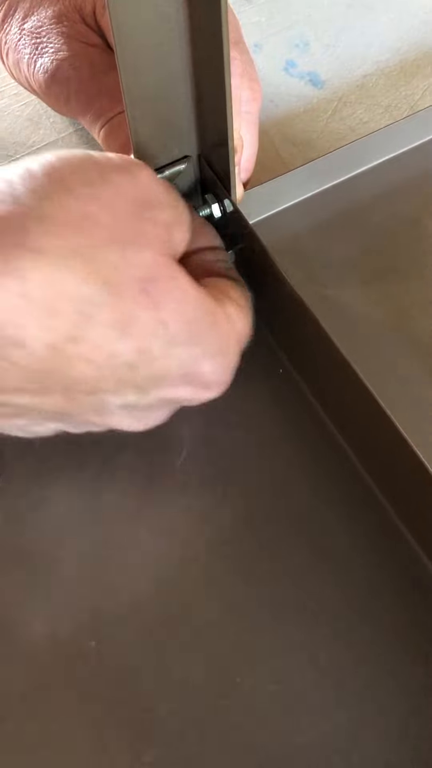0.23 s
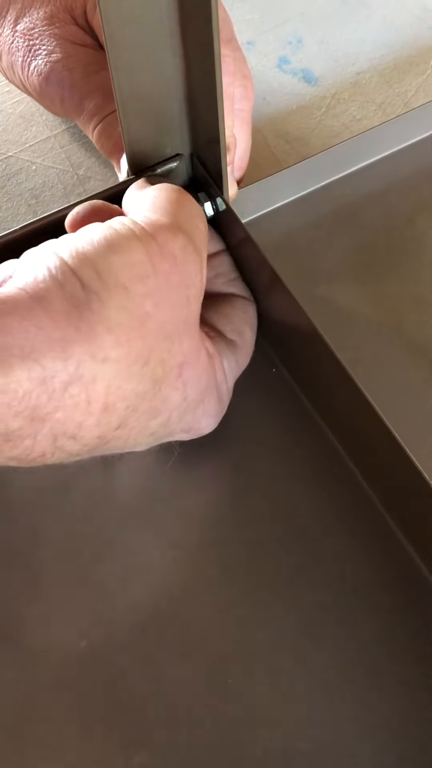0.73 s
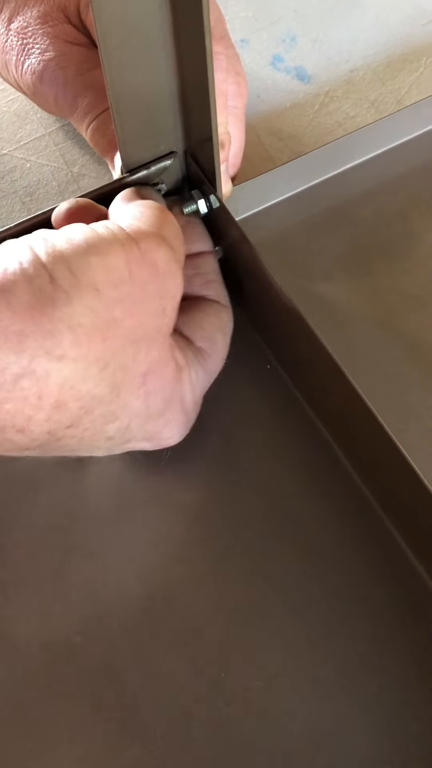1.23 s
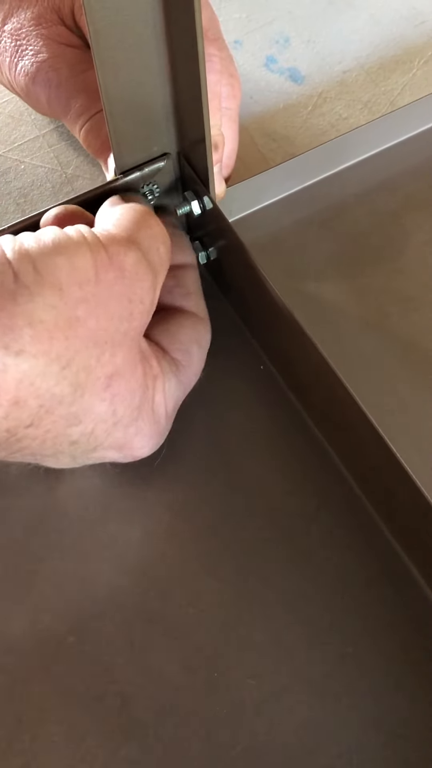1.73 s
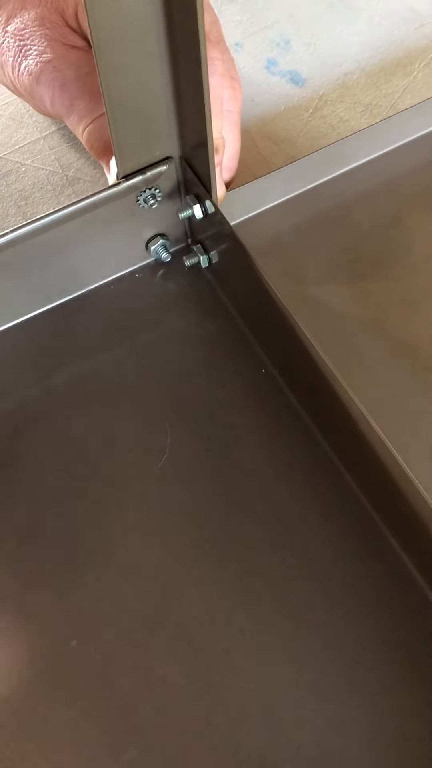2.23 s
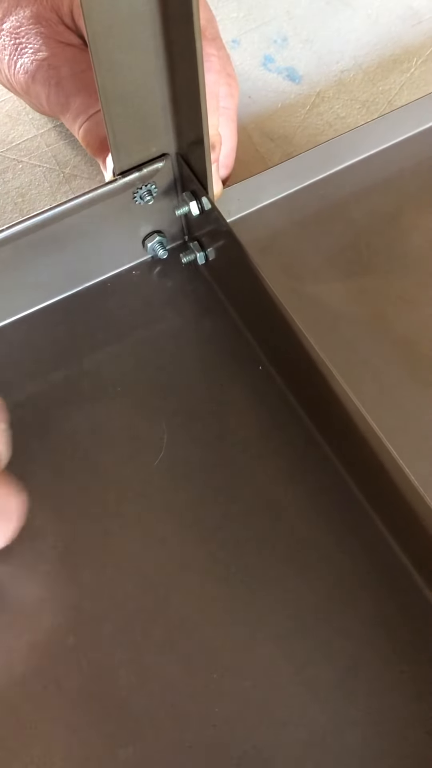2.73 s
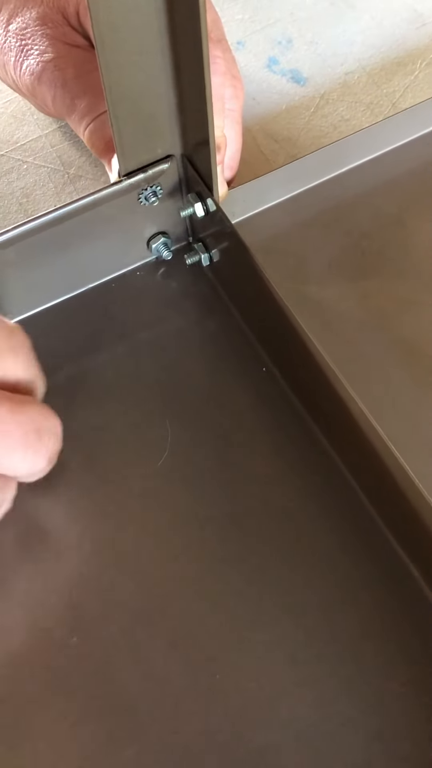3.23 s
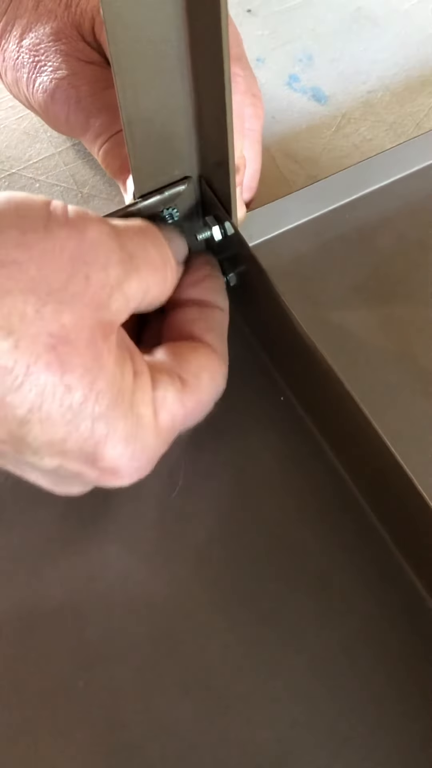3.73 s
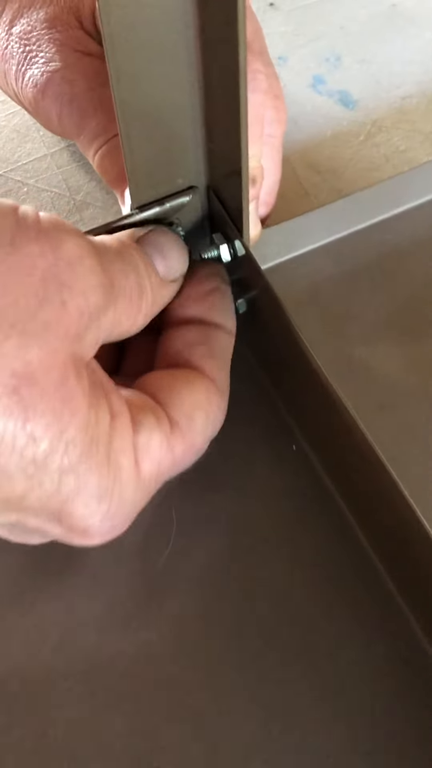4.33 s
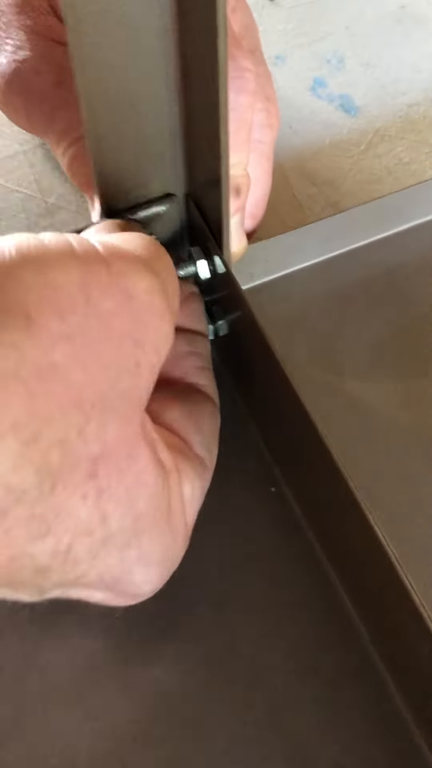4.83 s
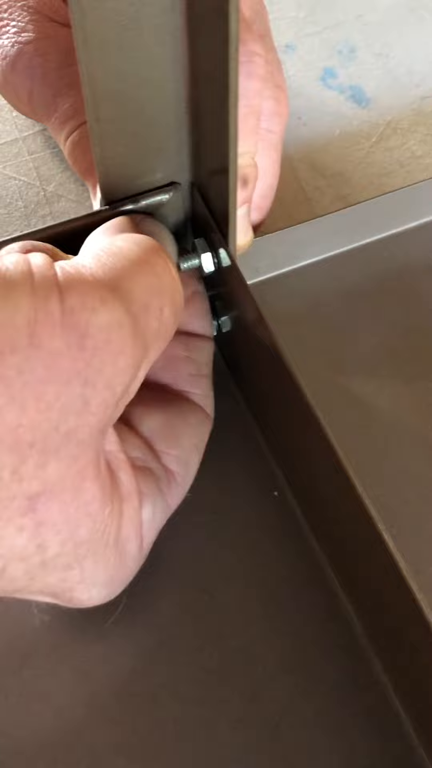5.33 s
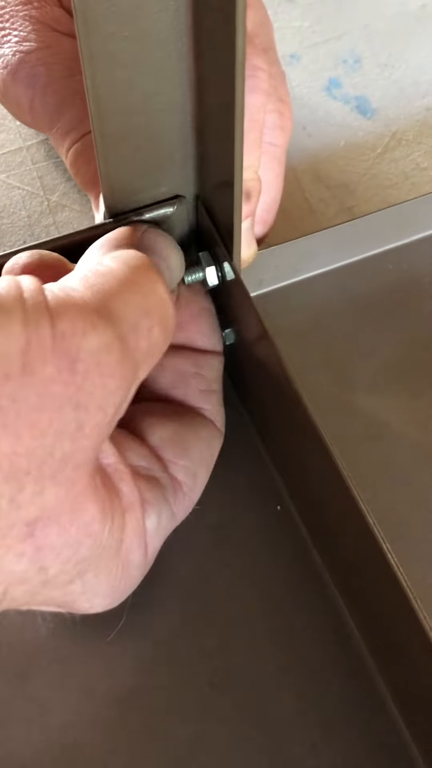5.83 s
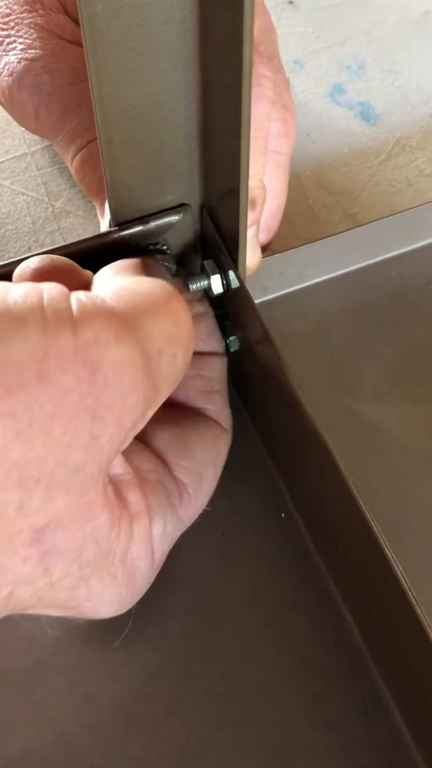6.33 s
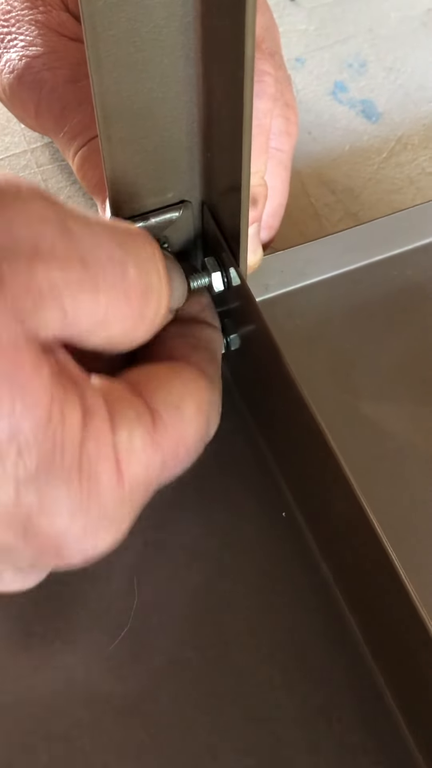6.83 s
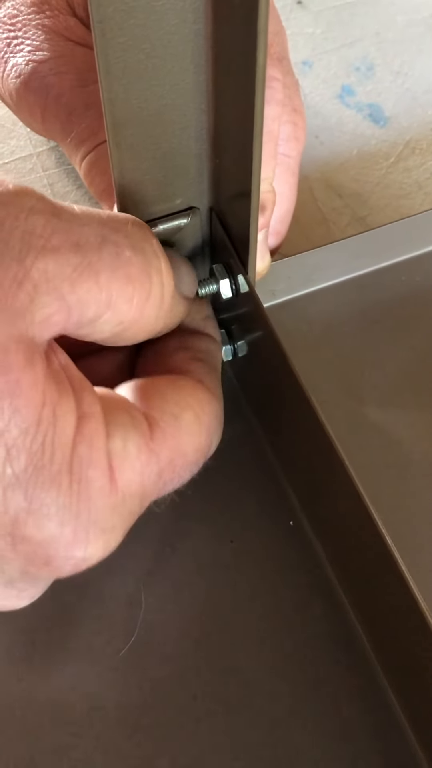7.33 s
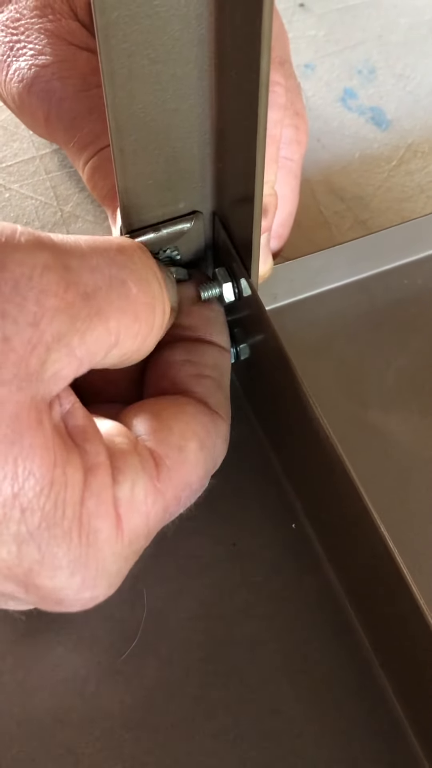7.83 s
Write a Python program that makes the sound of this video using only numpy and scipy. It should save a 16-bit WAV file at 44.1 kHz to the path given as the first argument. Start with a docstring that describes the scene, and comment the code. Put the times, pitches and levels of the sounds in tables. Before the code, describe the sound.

Close, sparse ticks and brief rattles of small steel hardware against a metal frame, soft finger scrapes and thumps, in a quiet humming room.

```python
"""Small steel parts, a washer and a nut being fitted to a screw by fingers, strike the corner of an upturned
steel table close to a phone. Each contact is a brief noise-like chatter of force that excites the damped modes
of the parts, the angle frame and the table top. In between, skin rubs on steel as shaped, grainy noise and the
leaning hand rumbles. A small room adds decaying noise tails, with a wavering hum and a low rumble behind."""
import sys
import numpy as np
from scipy import signal
from scipy.fft import rfft, irfft, next_fast_len
from scipy.io import wavfile
from scipy.ndimage import uniform_filter1d, map_coordinates

SR = 44100
rng = np.random.default_rng(int(sys.argv[2]) if len(sys.argv) > 2 else 0)


def file_out(sig):
    """Save sig as 16-bit WAV at sys.argv[1]."""
    # one column per channel
    cols = np.atleast_2d(sig).T
    # limit, then scale
    lim = np.clip(cols, -1, 1)
    pcm = np.round(lim * 32767).astype(np.int16)
    wavfile.write(sys.argv[1], SR, pcm)


N = 357033  # samples

# Spectrum of the room tone. Each row: frequency in Hz, relative density in dB per Hz.
ROOM_TONE_SPECTRUM = [(15, -48), (25, -11), (55, -0.5), (134, -13), (195, -2.5), (242, -4.5), (326, -12),
                      (439, -10.5), (476, -14.5), (1020, -24), (1520, -30.5), (2050, -29.5), (4740, -36.5),
                      (14800, -44), (16000, -49.5)]
# Tones of the machine hum. Each row: frequency in Hz, middle rms level in dB.
HUM_TONES = [(193.8, -57.5), (153, -67.5)]
# Fingers resting between slides. Each row: time in seconds, drone level in dB.
RESTING_FINGERS = [(0, -74), (.9, -75), (1.55, -74), (2, -72), (3, -66), (3.55, -73), (4.3, -69.5),
                   (5.7, -74), (6.9, -75), (7.55, -79.5), (8.1, -75.5)]
# Slides of skin on steel. Each row: start in seconds, hold in seconds, then the levels of frame drone,
# scrape and hiss in dB.
SKIN_SLIDES = [(.01, 0.034, -60, -66, -78), (.1, 0.12, -59.5, -66, -69.5), (.35, 0.078, -64, -56.5, -63),
               (.5, 0.038, -64, -64, -73), (.76, 0.048, -66, -63, -68), (1.035, 0.14, -66, -70, -67),
               (1.165, 0.11, -60, -69, -83), (1.325, 0.042, -53.5, -69.5, -88),
               (1.66, 0.057, -74, -64.5, -82), (1.84, 0.028, -78, -70, -73), (1.97, 0.045, -70, -64, -69),
               (2.095, 0.058, -60, -65.5, -85), (2.204, 0.083, -56, -59.5, -59.5),
               (2.4, 0.11, -67, -68.5, -74), (2.6, 0.069, -57.5, -55, -63), (2.77, 0.059, -58, -56.5, -61),
               (2.953, 0.013, -61, -67, -85), (3.117, 0.022, -55.5, -52.5, -66),
               (3.21, 0.085, -64.5, -72, -85), (3.36, 0.042, -87, -68, -73), (3.6, 0.16, -69.5, -77, -78),
               (3.81, 0.045, -73, -60.5, -75), (4.07, 0.012, -61, -66, -86), (4.44, 0.3, -76, -77, -83),
               (4.575, 0.051, -54.5, -64, -81), (4.88, 0.017, -56.5, -76, -74),
               (4.98, 0.039, -75, -72, -75), (5.17, 0.038, -60, -52.5, -58.5),
               (5.38, 0.042, -71, -69, -68.5), (5.515, .05, -65, -61.5, -74.5), (5.6, 0.037, -65, -84, -99),
               (5.82, 0.16, -65, -64, -77), (6.05, 0.19, -66, -63, -69), (6.35, 0.07, -56.5, -63.5, -72),
               (6.53, .02, -60, -65.5, -83), (6.585, 0.022, -61.5, -66, -82), (6.73, .1, -62, -71, -78),
               (6.98, 0.025, -64.5, -72.5, -90), (7.08, 0.034, -59, -80, -89.5),
               (7.21, 0.019, -55, -53.5, -60), (7.34, 0.054, -70, -70, -77), (7.66, 0.072, -64, -67, -75),
               (7.856, 0.026, -82, -58.5, -70)]
# Drone of the rubbed frame. Each row: frequency in Hz, relative density in dB per Hz.
DRONE_SPECTRUM = [(300, -16), (700, -4), (1000, -4), (1400, -0.5), (1900, -3), (2350, -6.5), (2800, -16),
                  (4000, -39.5)]
# Scrape of the rubbed parts. Each row: frequency in Hz, relative density in dB per Hz.
SCRAPE_SPECTRUM = [(2000, -13), (2800, -6.5), (4800, -9.5), (6500, -14), (9000, -50.5)]
# Hiss of the sliding skin. Each row: frequency in Hz, relative density in dB per Hz.
HISS_SPECTRUM = [(5000, -32), (7000, -3), (10000, -7), (15500, -12.5)]
# The hand leans on the table. Each row: start in seconds, hold in seconds, rumble level in dB.
HAND_LEANS = [(.07, .07, -54.5), (.32, .18, -49), (.7, .13, -59.5), (1.16, .07, -61), (1.55, .05, -60),
              (1.98, .04, -59.5), (2.14, .04, -50), (2.36, .05, -56), (2.68, .15, -51.5), (3.2, .06, -59),
              (3.62, .18, -59.5), (4.5, .06, -56.5), (4.76, .04, -57), (4.87, .09, -53),
              (5.005, 0.031, -51.5), (5.15, .18, -54), (5.8, .08, -54), (6.03, .04, -47.5), (6.44, .2, -54),
              (6.73, .13, -62), (7, .13, -54), (7.2, .04, -55.5), (7.38, .04, -60), (7.61, .13, -57)]
# Rumble of the table under the hand. Each row: frequency in Hz, relative density in dB per Hz.
RUMBLE_SPECTRUM = [(25, -20), (50, -7), (140, -1.5), (220, -16.5), (400, -60)]
# Contacts of metal on metal. Each row: start in seconds, levels of parts, table top, frame and crack in dB
# (loudest 10 ms, before the bass cut), centre frequency of the parts in Hz, chatter time in seconds.
METAL_CONTACTS = [(0.027, -48, -52, -51, -51, 4400, 0.0037), (.071, -47, -49, -47, -66, 3560, 0.0096),
                  (.079, -58, -59, -46.5, -50.5, 3950, 0.012), (.291, -59.5, -47, -55, -54.5, 3740, 0.034),
                  (.318, -47, -38, -40.5, -68, 4300, 0.0078), (.337, -41, -37, -44, -36, 5070, 0.0054),
                  (0.342, -29.5, -66, -43.5, -31.5, 5660, 0.007),
                  (0.468, -64, -48.5, -54, -74, 4650, 0.012), (0.497, -56, -70, -60, -67, 3540, .007),
                  (.52, -60, -72, -55, -70, 4000, 0.0078), (0.741, -65, -51, -56, -69, 3450, 0.011),
                  (.766, -61, -66, -66, -60, 3500, .004), (.8, -74, -77, -72, -61, 5000, .003),
                  (0.873, -59, -93, -61.5, -73, 3820, 0.0062), (1.063, -60, -58, -61, -71, 3740, 0.0046),
                  (1.159, -50.5, -71, -55, -51, 5750, 0.011), (1.256, -63, -77, -66, -78, 3500, .004),
                  (1.279, -55.5, -82, -58, -58.5, 4100, 0.026), (1.499, -48, -71, -58, -49, 4850, 0.026),
                  (1.521, -49, -69, -55.5, -59, 5130, 0.0088), (1.54, -47, -69, -56, -45.5, 5300, 0.0083),
                  (1.698, -60, -80, -58.5, -73, 3590, .007), (1.754, -49.5, -67, -64, -69, 4000, 0.013),
                  (1.843, -62.5, -72, -63.5, -70, 3600, .008), (2.134, -55, -44.5, -56.5, -57, 4570, 0.011),
                  (2.337, -61, -50, -59, -68.5, 3500, 0.0052), (2.531, -61.5, -69, -57, -75, 3720, 0.024),
                  (2.685, -48, -46.5, -43, -57, 4900, 0.0091), (2.696, -32.5, -70, -55, -30, 5700, 0.016),
                  (2.704, -33.5, -51, -43, -35, 5400, .011), (2.726, -28.5, -55, -44, -36, 5120, 0.0052),
                  (2.733, -37, -73, -47, -50, 5120, .007), (2.744, -27.5, -63, -39, -27.5, 5070, .007),
                  (2.757, -39.5, -59, -49, -79, 4830, 0.014), (3.027, -62.5, -70, -64, -78, 3860, 0.0069),
                  (3.183, -47, -79, -53.5, -54.5, 4570, 0.013), (3.365, -58, -76, -62.5, -63.5, 3740, 0.02),
                  (3.611, -63, -75, -82, -65, 4600, 0.0032), (3.626, -75, -53.5, -58.5, -102, 4210, .005),
                  (3.645, -64, -75, -72, -81, 4700, .003), (3.718, -62, -67, -71, -70, 4970, 0.0024),
                  (3.75, -59.5, -54, -61, -70, 4160, 0.0047), (3.994, -63, -63, -56.5, -66, 3830, .007),
                  (4.258, -60.5, -72, -61, -71, 4050, 0.026), (4.434, -44.5, -65, -60, -52.5, 5170, 0.0099),
                  (4.6, -36.5, -60, -47.5, -44.5, 3940, 0.0021), (4.785, -67, -57, -59, -88, 4500, .016),
                  (4.838, -62, -66, -57, -67, 4500, 0.011), (4.86, -62, -41, -39.5, -82, 5000, 0.0095),
                  (4.868, -49, -37.5, -40.5, -51.5, 4930, 0.01),
                  (5.007, -53.5, -54, -58.5, -64, 3970, 0.0098), (5.132, -61, -67, -61, -67, 4470, 0.024),
                  (5.153, -38, -45, -41, -49, 4140, 0.028), (5.162, -35, -53, -57, -33.5, 4340, 0.018),
                  (5.342, -59, -59, -61, -89, 3670, 0.019), (5.558, -74, -75, -70, -60.5, 5000, 0.0033),
                  (5.569, -66, -58, -57, -83, 3800, .005), (5.714, -65.5, -60, -53, -94, 3100, 0.0078),
                  (5.891, -61, -55, -55, -71.5, 3730, 0.016), (6.014, -62, -55, -52.5, -73, 3940, 0.012),
                  (6.029, -23, -34, -26.5, -25, 3800, 0.0034), (6.033, -31, -29.5, -31, -41, 4000, 0.0028),
                  (6.383, -64, -54.5, -59, -63, 3600, .007), (6.422, -32, -58, -32.5, -43, 3500, 0.0065),
                  (6.515, -43.5, -56, -43, -57, 3430, 0.012), (6.577, -66, -49.5, -43, -78, 3500, 0.0061),
                  (6.721, -45, -52.5, -36.5, -49, 4040, 0.0032),
                  (6.828, -52.5, -56, -55, -66.5, 4200, 0.0092), (7.068, -43, -56.5, -38, -56, 3730, .01),
                  (7.188, -29.5, -47, -38.5, -28, 4400, 0.0062),
                  (7.192, -41, -44.5, -47, -48.5, 4900, 0.0058), (7.674, -65, -79, -73, -58, 3900, .009),
                  (7.689, -48.5, -48.5, -47, -81, 3280, 0.0053), (7.7, -48, -90, -47, -70, 3460, 0.0029),
                  (7.996, -75, -64, -59, -106, 3950, .006)]
# Bare metal-on-metal edge. Each row: frequency in Hz, gain in dB.
CRACK_SPECTRUM = [(5500, -12), (7200, -2.5), (9000, -2), (12000, -6.5), (15500, -10.5)]
# Modes of screw and nut, damped by the fingers. Each row: nominal frequency in Hz, strength in dB before
# the weighting by the touched spot, t60 in seconds.
PART_MODES = [(2750, 0, .008), (3060, 0, .008), (3400, -2, .008), (3770, -1, .008), (4050, -1, .008),
              (4400, -1, .008), (4750, -1, .008), (5050, -1, .008), (5450, -1, .008), (5940, 0, .008),
              (6400, -1, .008), (6920, -3, .008)]
# Modes of the washer. Each row: as for screw and nut, frequency in Hz, strength in dB, t60 in seconds.
WASHER_MODES = [(4730, 5, 0.2), (9620, 2, .2)]
# Spans in which the washer hangs free. Each row: from in seconds, to in seconds, ring in dB over the parts.
LOOSE_WASHER = [(2.69, 2.74, -12), (2.74, 2.77, -10), (3.17, 3.2, -14), (4.59, 5.02, -18)]
# Modes of the angle frame, held in one hand. Each row: frequency in Hz, strength in dB, t60 in seconds.
FRAME_MODES = [(900, -14, .01), (1280, -6, .01), (1450, -3, .02), (1600, -1, .02), (1790, -2, .012),
               (2050, -1, .012), (2410, 2, .015)]
# Modes of the table top. Each row: frequency in Hz, strength in dB, t60 in seconds.
TOP_MODES = [(145.8, 12.5, 0.09), (215.9, -1.5, 0.31), (251, -10, 0.42), (297.7, -2, 0.11),
             (347.2, -8, 0.1), (424.5, -0.5, 0.047), (469, -7, 0.11), (516, 8.5, 0.023), (630, -8, 0.018),
             (800, 3, .02), (970, 24.5, 0.016)]
# Early decay of the room. Each row: frequency in Hz, t60 in seconds.
WALL_DECAY = [(200, 0.25), (1000, 0.19), (4000, 0.12), (12000, 0.07)]

SWELL_DB, SWELL_RATE = 1.6, 3.3  # room tone: random swell, knots a second
REST_SCRAPE_DB, REST_HISS_DB = -0.5, -7  # over the resting drone
SLIDE_ATTACK_S, SLIDE_RELEASE_S, SLIP_DB = 0.006, 0.046, 1.3
LEAN_ATTACK_S, LEAN_RELEASE_S, LEAN_REST_DB = 0.011, 0.034, -71
BLOCK = 2 ** 14  # samples of one contact with its ringing
HELD_DB = -42  # washer ring under the fingers, over the parts
TOP_CENTRE_HZ, GRIPPED_HZ, GRIPPED_S = 315, 393, 5.8  # top centre; higher once the nut grips the screw
# frame centre: up with the crack, down with the table top, both over the frame level
FRAME_HZ, OCTAVES_PER_DB, DEEPER_PER_DB = 1480, 0.008, 0.009
LATE_DB, LATE_LONGER = -15, 3.25  # a weaker, slower tail from the far end of the room
BAND_LIMIT_HZ = 15900


def amp(db):
    """Logarithmic level: decibels become an amplitude ratio."""
    return 10 ** (np.asarray(db) / 20)


def unit(x):
    """Normalisation of mean power: the signal is scaled to rms 1."""
    return x / np.sqrt(np.mean(x ** 2) + 1e-20)


def levelled(x):
    """Short-time power: the loudest 10 ms is scaled to rms 1."""
    power = uniform_filter1d(x ** 2, size=SR // 100)
    return x / np.sqrt(np.abs(power).max())


def along(points, hz):
    """Logarithmic frequency scale: (Hz, value) points are interpolated on it."""
    f, value = np.transpose(points)
    return np.interp(np.log(hz + 1), np.log(f + 1), value)


def wobble(rate):
    """Slow random fluctuation: a smooth curve through random knots, rate of them a second."""
    knots = rng.standard_normal(int(N * rate / SR) + 4)
    return map_coordinates(knots, [np.arange(N) * rate / SR])


def filtered(x, response):
    """Linear filtering: the spectrum is multiplied by a response of frequency."""
    m = next_fast_len(N + SR // 2)
    gain = response(np.fft.rfftfreq(m, 1 / SR))
    return irfft(rfft(x, m) * gain, m)[..., :N]


def coloured(spectrum, grit_db):
    """Random friction and flow: noise in grains of uneven size, spectrally shaped to rms 1."""
    grains = amp(grit_db * wobble(300)) * rng.standard_normal(N)
    return unit(filtered(grains, lambda hz: amp(along(spectrum, hz)) * (hz > 33)))


def swells(rows, attack, release):
    """Exponential rise, hold and decay, one gain curve per dB column; overlapping powers add."""
    t, power = np.arange(N) / SR, 0
    for start, hold, *db in rows:
        rise = 1 - np.exp(-np.maximum(t - start, 0) / attack)
        fall = np.exp(-np.maximum(t - start - hold, 0) / release)
        power = power + (amp(db)[:, None] * rise * fall) ** 2
    return np.sqrt(power)


def room_tone():
    """Stationary ambient noise: a shaped, mostly low spectrum whose level swells slowly."""
    level = amp(-59.5 + SWELL_DB * wobble(SWELL_RATE))
    return level * coloured(ROOM_TONE_SPECTRUM, grit_db=-0.1)


def machine_hum():
    """Steady periodic excitation: sine tones that waver slowly in level and phase."""
    t, hum = np.arange(N) / SR, 0
    for hz, db in HUM_TONES:
        level = np.sqrt(2) * amp(db + 2.3 * wobble(3.9))  # rms to peak
        hum = hum + level * np.sin(2 * np.pi * hz * t + 0.065 * wobble(2.3))
    return hum


def rubbing_skin():
    """Friction: sliding skin drones in the frame, scrapes the parts and hisses, in a shared stick and slip."""
    rest_db = np.interp(np.arange(N) / SR, *np.transpose(RESTING_FINGERS))
    rest = amp(rest_db + np.array([[0], [REST_SCRAPE_DB], [REST_HISS_DB]]))
    slides = swells(SKIN_SLIDES, SLIDE_ATTACK_S, SLIDE_RELEASE_S)
    drone, scrape, hiss = np.hypot(rest, slides) * amp(SLIP_DB * wobble(25))
    rubbed = drone * coloured(DRONE_SPECTRUM, grit_db=2.0)
    rubbed += scrape * coloured(SCRAPE_SPECTRUM, grit_db=1.44)
    return rubbed + hiss * coloured(HISS_SPECTRUM, grit_db=2.5)


def leaning_hand():
    """Low-frequency forcing: the weight of the leaning hand rumbles in the table."""
    leans = swells(HAND_LEANS, LEAN_ATTACK_S, LEAN_RELEASE_S)[0]
    weight = np.hypot(amp(LEAN_REST_DB), leans)
    return weight * coloured(RUMBLE_SPECTRUM, grit_db=0.8)


def struck(force, modes, centre_hz):
    """Modal superposition: a force excites damped sines, at new strengths and slightly new pitches each time."""
    hz, db, t60 = np.transpose(modes)[:, :, None]
    t = np.arange(min(BLOCK // 2, round(t60.max() * SR))) / SR
    spread, detune = rng.standard_normal((2, *hz.shape))
    # the touched spot favours modes near one pitch
    db = db + 2.2 * spread - 18 * np.log2(hz / centre_hz) ** 2
    build_up = 1 - np.exp(-t * hz / 0.48)  # a mode needs a cycle or so
    decay = amp(db - 60 * t / t60)
    side = (-1) ** np.arange(len(modes))[:, None]  # neighbouring modes move in opposite phase
    tones = np.sin(2 * np.pi * hz * (1 + 0.015 * detune) * t)
    ring = np.sum(side * build_up * decay * tones, axis=0)
    return levelled(irfft(rfft(force, BLOCK) * rfft(ring, BLOCK), BLOCK))


def chatter_force(chatter):
    """Repeated impact: a burst of micro-bounces, as noise of uneven steps, dies over the chatter time."""
    t = np.arange(BLOCK // 2) / SR
    shape = (1 - np.exp(-t / 0.00033)) * np.exp(-(t / chatter) ** 1.29)
    shape *= 1 + 0.98 * np.exp(-t / 0.00048)  # the first bounce is the hardest
    bounces = amp(2.4 * rng.standard_normal(len(t) // 32).repeat(32))
    return shape * bounces * rng.standard_normal(len(t))


def joint_rattle():
    """Residual vibration: the loose joint keeps rattling finely as decaying noise."""
    t = np.arange(BLOCK // 2) / SR
    return amp(-17.5 - 60 * t / 0.12) * rng.standard_normal(len(t))


def edge_crack(force):
    """Direct radiation: the bare metal edge gives out the treble of the force itself."""
    edge = amp(along(CRACK_SPECTRUM, np.fft.rfftfreq(BLOCK, 1 / SR)))
    crack = irfft(rfft(force, BLOCK) * edge, BLOCK)
    return levelled(np.roll(crack, 4))  # four samples late


def contacts():
    """Coupled excitation: the chatter of each contact drives all bodies, each with its own modes."""
    out = np.zeros(N + BLOCK)
    for start, parts_db, top_db, frame_db, crack_db, parts_hz, chatter in METAL_CONTACTS:
        octaves = OCTAVES_PER_DB * (crack_db - frame_db) - DEEPER_PER_DB * (top_db - frame_db)
        frame_hz = FRAME_HZ * 2 ** octaves
        top_hz = GRIPPED_HZ if start > GRIPPED_S else TOP_CENTRE_HZ
        free_db = [db for begin, end, db in LOOSE_WASHER if begin < start < end]
        ring_db = max([HELD_DB] + free_db)

        force = chatter_force(chatter)
        crack = edge_crack(force)
        washer = amp(ring_db) * struck(force, WASHER_MODES, WASHER_MODES[0][0])
        force = force + joint_rattle()  # drives the other bodies only
        parts = struck(force, PART_MODES, parts_hz) + washer
        sound = amp(parts_db) * parts
        sound += amp(frame_db) * struck(force, FRAME_MODES, frame_hz)
        sound += amp(top_db) * struck(force, TOP_MODES, top_hz)
        sound += amp(crack_db) * crack
        out[round(start * SR):][:BLOCK] += sound
    # the table radiates no deep bass
    return filtered(out[:N], lambda hz: (1j * hz / (1j * hz + 110)) ** 2)


def room(x):
    """Reverberation: random tails, redrawn every third of a second, decay at a speed set by frequency."""
    out, step = np.zeros(N + SR), SR // 3
    for start in range(0, N, step):
        hz, t, z = signal.stft(rng.standard_normal(SR // 2), SR, nperseg=256)
        fall_db = -60 * t / along(WALL_DECAY, hz)[:, None]
        decay = np.hypot(amp(fall_db), amp(LATE_DB + fall_db / LATE_LONGER))
        tail = signal.istft(z * decay, SR, nperseg=256)[1]
        wet = signal.fftconvolve(x[start:start + step], tail / np.linalg.norm(tail))
        out[start + 180:][:len(wet)] += wet  # 180 samples before the walls answer
    return out[:N]


def scene():
    """Superposition: background, fingers, metal contacts and the room's answer to the contacts add."""
    background = room_tone() + machine_hum()
    fingers = rubbing_skin() + leaning_hand()
    metal = contacts()
    return (metal + amp(-9.5) * room(metal) + fingers + background)[None]


def record(dry):
    """Band limitation: the phone keeps nothing from its upper limit on."""
    return filtered(dry, lambda hz: hz < BAND_LIMIT_HZ)


dry = scene()
out = record(dry)
file_out(out)
```